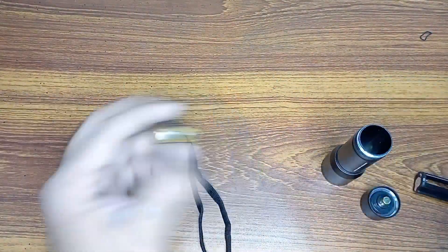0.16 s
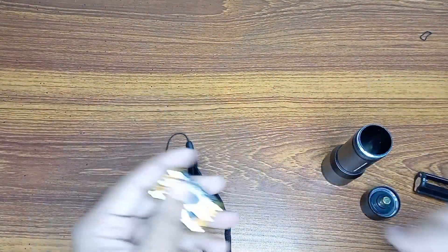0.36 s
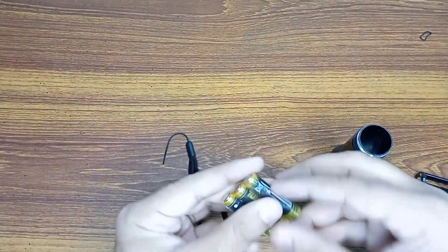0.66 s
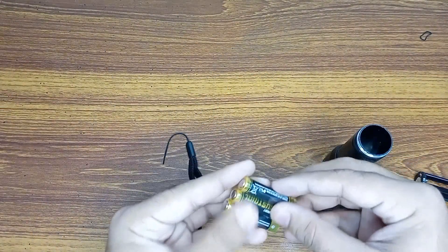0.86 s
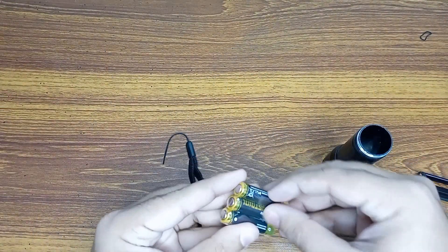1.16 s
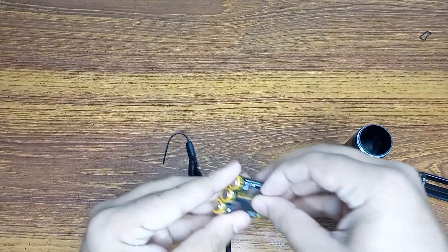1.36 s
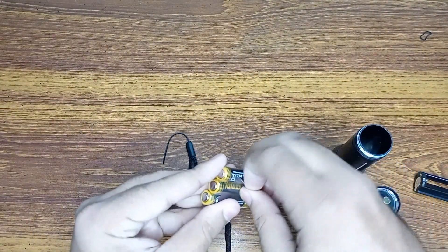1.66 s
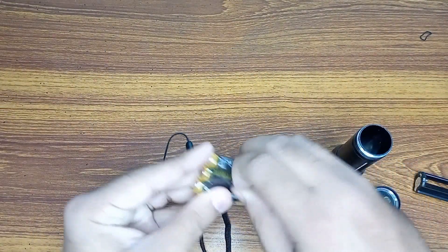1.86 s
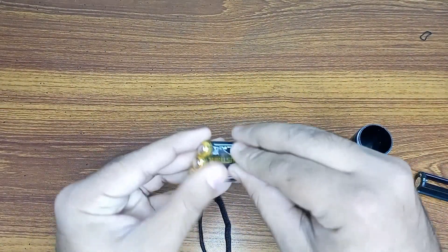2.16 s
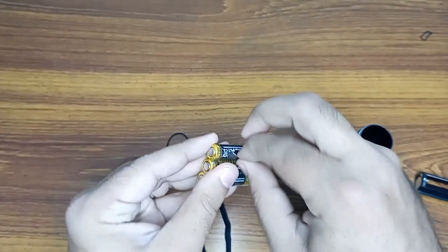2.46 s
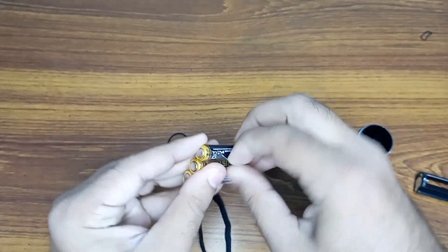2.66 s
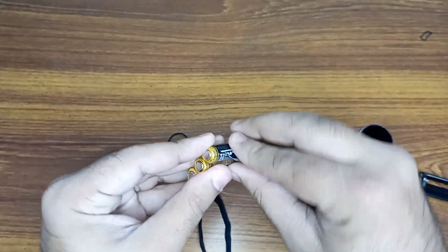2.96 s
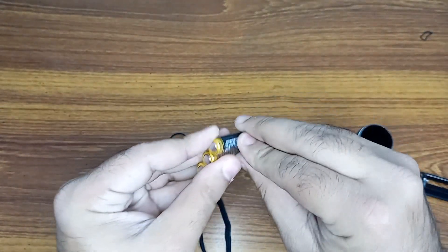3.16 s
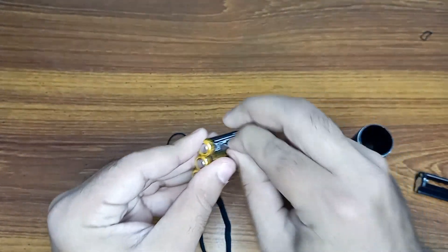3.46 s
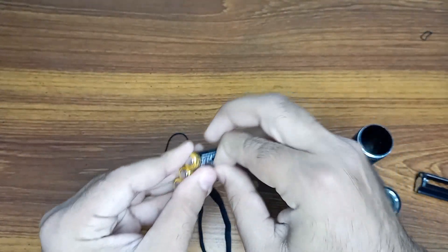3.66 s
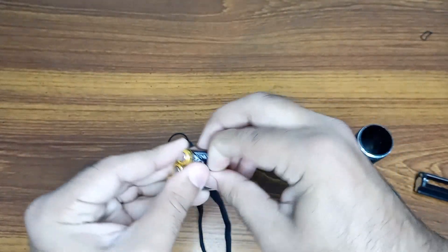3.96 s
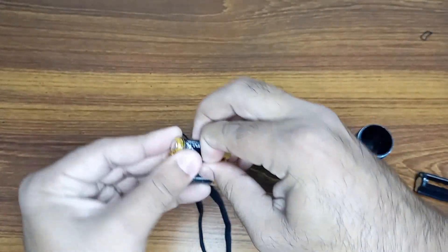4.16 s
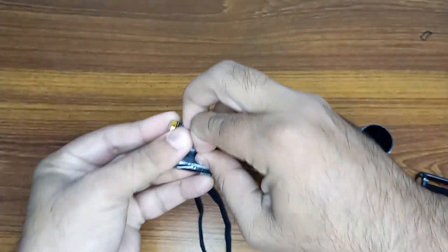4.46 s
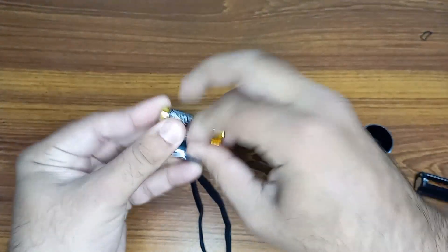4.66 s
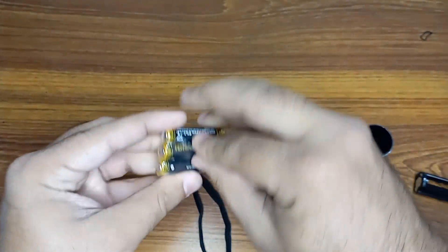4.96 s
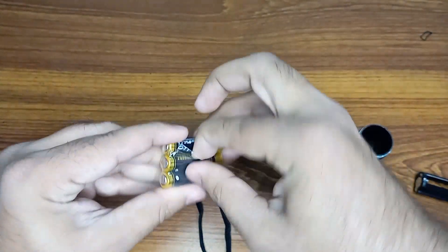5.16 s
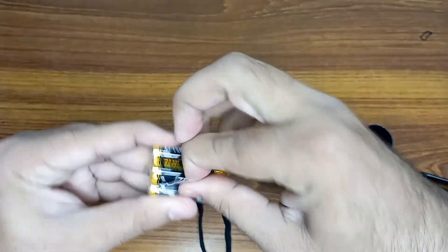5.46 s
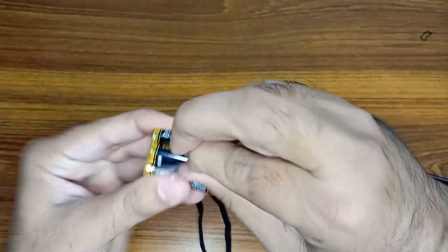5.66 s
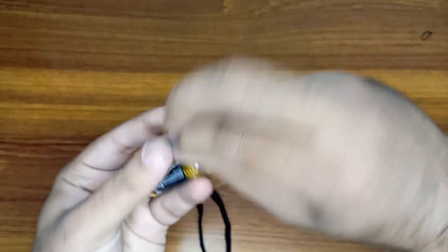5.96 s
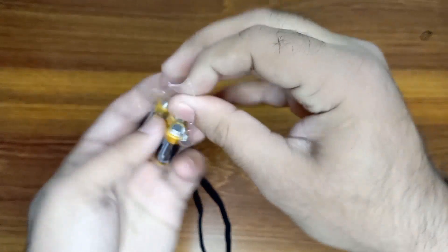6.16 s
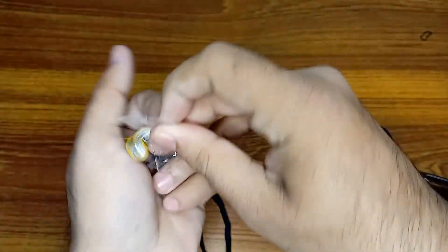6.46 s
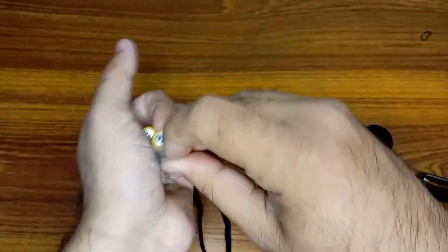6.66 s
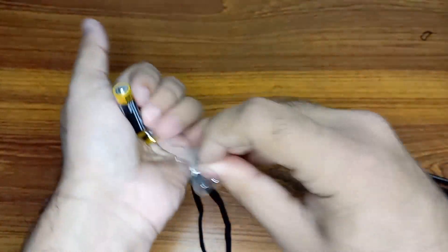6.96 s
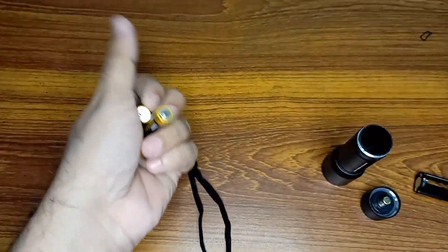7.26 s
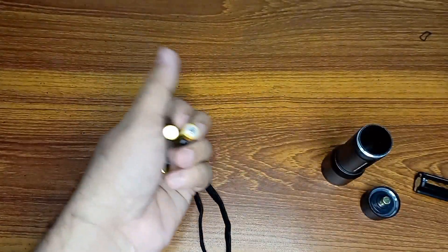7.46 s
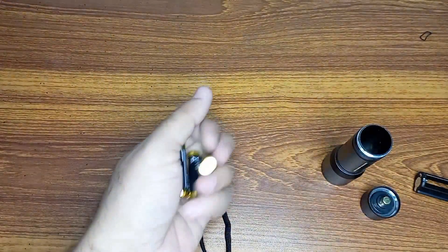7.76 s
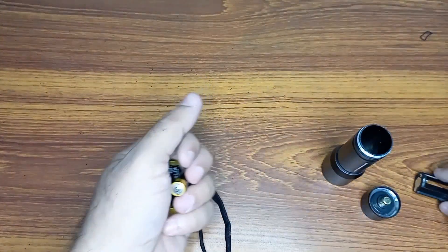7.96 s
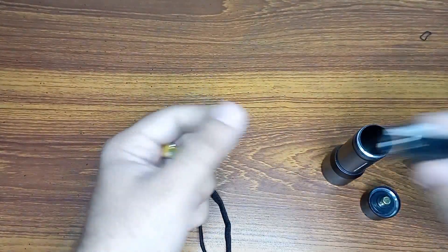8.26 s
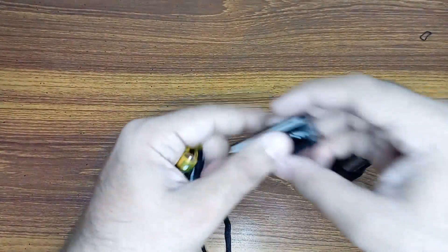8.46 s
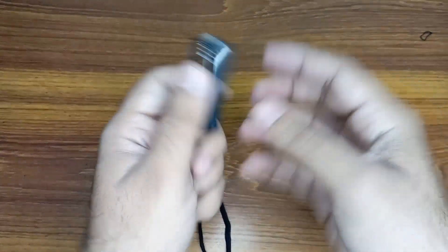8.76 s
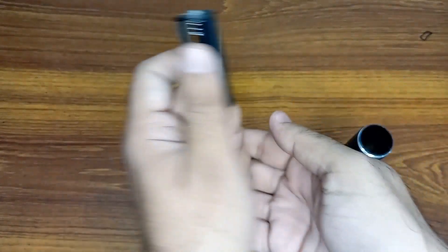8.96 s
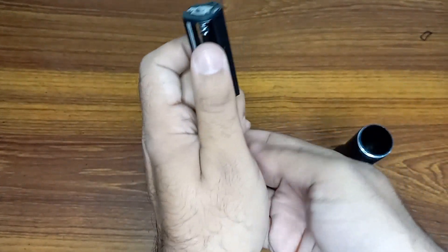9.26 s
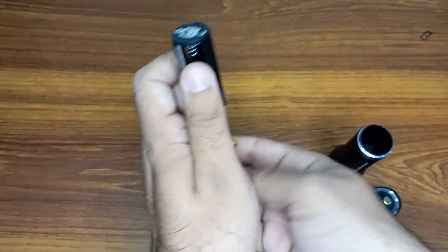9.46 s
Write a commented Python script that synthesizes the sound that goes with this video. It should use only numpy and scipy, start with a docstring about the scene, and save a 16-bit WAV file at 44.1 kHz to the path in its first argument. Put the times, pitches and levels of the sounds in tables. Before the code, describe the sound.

Over low room hum and thin hiss, tiny clicks lead to a loud, crisp snap of stiff plastic. After a pause, a blow bumps the left side of the microphone, and a faint motor far outside swells and rises in pitch. Wrapping then snaps and rustles rapidly around loose batteries, stops, and leaves a distant light clatter and muted handling in a small live room.

```python
"""Sparse snaps of stiff shrink wrap on a battery pack come first, over room hum and hiss with a faint distant motor.
A blow jolts the left microphone port at 4.1 s; then the motor swells and picks up speed, and from 5.3 s the film
snaps and crackles densely as fingers rub it and the cells and holder bump dully. Near 8 s something light lands
far off; soft bumps end the scene. Snaps are damped noise bursts shaped in five bands, rubbing is grainy noise,
bumps are resonated noise, the motor is a sine; near echoes and a noise tail make the room."""
import sys
import numpy as np
from scipy import signal
from scipy.fft import rfft, irfft, next_fast_len
from scipy.io import wavfile

SR = 44100
rng = np.random.default_rng(int(sys.argv[2]) if len(sys.argv) > 2 else 0)


def generate_wav(signal):
    """Clip the signal to [-1, 1] and save it as 16-bit WAV at the path in sys.argv[1]."""
    frames = np.transpose(np.atleast_2d(signal))
    scaled = np.clip(frames, -1, 1) * 32767
    pcm = np.round(scaled).astype(np.int16)
    wavfile.write(sys.argv[1], SR, pcm)


N = 424241

# snaps of film, clicks of cells and holder: start_s, level_db (main band), weight_db (how hard it shakes the pack),
# pitch_hz (part that springs loose), pan_db (left minus right), room_send_db (relative to the snap)
SNAPS = [(0.3626, -62.5, 15, 3900, 0, 0.5), (.4043, -57.5, 3, 5700, 2, -7), (0.5627, -61.5, 8, 10900, 2, 3),
         (1.0309, -57.5, 6, 8400, -1, -9), (1.2285, -54.5, 0, 5300, -1, -9),
         (1.2499, -52.5, 2, 5500, 3, -4.5), (1.2768, -55, 4, 5200, 2, -7.5),
         (1.4951, -43.5, -13, 5400, 0, -5.5), (1.8798, -19, 2.5, 9660, 4.5, -3.5),
         (2.0951, -57.5, -11, 10550, 5, -4), (2.2242, -37.5, 4.5, 10100, 0, -3),
         (2.8813, -56.5, 11, 9900, 2, 2), (4.0999, -25.5, -13, 9900, 2, 3),
         (4.4663, -42, -28, 10600, 6, -3), (4.7293, -46.5, -3, 10300, 3, 0), (4.751, -40, 0, 8400, 3, 5),
         (4.7625, -36, -6.5, 11300, 6, -2), (4.831, -39, 6, 9300, 3, -4), (4.931, -47.5, -3, 9800, 2, -4),
         (5.3824, -35.5, -8.5, 8200, -2, 2), (5.3974, -39.5, -17, 11200, 7.5, -3),
         (5.4239, -25, 7, 6500, 2, -5), (5.5639, -27.5, -16.5, 11400, 3, 1),
         (5.8012, -21, -18.5, 10800, 6, -2), (5.8719, -16.5, 8.5, 10000, 2.5, -8.5),
         (5.8874, -33.5, -4.5, 9600, -2.5, 8), (5.905, -28.5, -14, 9600, 8, 0),
         (5.9529, -36, -15, 9300, 13, 2), (5.97, -34, -5.5, 5300, 5, 0), (5.9989, -38, -15, 9400, 16, 6),
         (6.1288, -37.5, -4.5, 9600, 6.5, 5), (6.1462, -34.5, 0, 10600, 5.5, 5),
         (6.17, -29, 1.5, 4800, 10.5, -6.5), (6.2796, -40.5, -7, 10500, 2, 9),
         (6.3028, -25.5, 2, 10700, 4.5, -4), (6.3191, -33.5, -12, 10600, 20, 0),
         (6.3469, -22, 2, 10300, 2, -2.5), (6.5082, -19.5, -5.5, 9600, 2, -2.5),
         (6.608, -44.5, 21, 9000, 1, 6), (6.7436, -42.5, 14.5, 9700, 0, 5),
         (6.8324, -24.5, -8, 8800, 1, -2), (6.931, -50, 14, 10200, 1, -24),
         (6.9736, -25.5, 4, 9500, 3.5, -2.5), (7.0064, -26.5, 12, 10300, 1, -3),
         (7.2132, -57, 26.5, 10200, 6, -4), (7.4724, -61, 23, 3400, -2, 0), (7.512, -34, 0, 3807, -1, -6),
         (7.534, -33.5, 0, 9600, -9, 1.5)]


def snaps():
    """All snaps: the sound straight from the hands, and what they send into the room."""
    direct, sent = np.zeros((2, N)), np.zeros((1, N))
    for start_s, level_db, weight_db, pitch_hz, pan_db, room_send_db in SNAPS:
        levels_db = level_db + snap_levels(weight_db, pitch_hz)
        add(direct, start_s - .0003, snap(levels_db, pitch_hz, pan_db))
        # summed over all directions a snap has a smooth spectrum, like one clean click
        click = signal.unit_impulse(1024)[None]
        add(sent, start_s, bands_of(click, levels_db + room_send_db, pitch_hz))
    return direct, sent[0]


def snap(levels_db, pitch_hz, pan_db, t60_s=.018, crack=0.86, crack_s=0.00033, recoil=0.33,
         alike=0.33, turn_hz=3300, turn_width_hz=2400):
    """One snap: a crack, a recoil a moment later, and the dense, quickly damped modes of film and cells."""
    t = np.arange(2048) / SR
    since_recoil = t - rng.uniform(0.0015, .003)
    first = crack * np.exp(-t / crack_s)
    second = recoil * (since_recoil > 0) * np.exp(-np.abs(since_recoil) / crack_s)
    envelope = from_db(-60 * t / t60_s) + first + second
    shared, *own = rng.standard_normal((3, len(t)))
    # the way round the housing to the right port turns the phase in the mid treble
    turned = shared - 2 * resonance(shared, turn_hz, turn_width_hz)
    noise = np.sqrt(alike) * np.array([shared, turned]) + np.sqrt(1 - alike) * np.array(own)
    port_gain = rms_one(from_db(np.array([[pan_db], [-pan_db]]) / 2))
    return bands_of(noise * envelope, levels_db, pitch_hz) * port_gain


# edges of the knock, body, clack, main and top bands: edge_hz
SNAP_EDGES_HZ = [200, 900, 3200, 7500, 11500, 14500]
# plain crack in each band: level_db
CRACK_DB = [-24.5, -15, -1.5, 0, -4]
# share of the weight taken by each band: ratio
WEIGHT_SHARE = [0.92, .55, .2, 0, 0]
# the loose part radiates best around its own pitch
LOOSE_LIFT_DB, LOOSE_SPREAD_OCTAVES = 6.5, 0.49


def snap_levels(weight_db, pitch_hz):
    """Band levels relative to the main band: weight adds lows, and the loose part lifts bands near its pitch."""
    edges = np.array(SNAP_EDGES_HZ)
    octaves = np.log2(np.sqrt(edges[1:] * edges[:-1]) / pitch_hz)
    lift_db = LOOSE_LIFT_DB * np.exp(-(octaves / LOOSE_SPREAD_OCTAVES) ** 2)
    colour_db = np.array(CRACK_DB) + weight_db * np.array(WEIGHT_SHARE) + lift_db
    return colour_db - colour_db[3]


# resonances of the pack held in the fingers: centre_hz, width_hz, lift_db
PACK = [(320, 360, 10), (1750, 700, 1)]


def bands_of(burst, levels_db, pitch_hz, ring_db=6.5, ring_width_hz=900):
    """Shapes a burst with the loose part's ring, pack resonances and band levels (energy spread over 6 ms)."""
    size, edges = burst.shape[-1], np.array(SNAP_EDGES_HZ)
    spectrum, hz = rfft(burst), np.arange(size // 2 + 1) * SR / size
    power = 2 * np.mean(np.abs(spectrum) ** 2, axis=0) / (size * .006 * SR)
    gain_db = -10 * np.log10(1 + (edges[0] / (hz + 1)) ** 6)   # small things radiate no bass
    for centre_hz, width_hz, lift_db in [(pitch_hz, ring_width_hz, ring_db), *PACK]:
        gain_db = gain_db + lift_db / (1 + (2 * (hz - centre_hz) / width_hz) ** 2)
    which = np.digitize(hz, edges)
    centres_hz = (edges[1:] + edges[:-1]) / 2
    for _ in range(4):   # neighbouring bands overlap, so their levels settle in a few rounds
        held_db = 10 * np.log10(np.bincount(which, power * from_db(gain_db) ** 2)[1:-1])
        gain_db = gain_db + np.interp(hz, centres_hz, levels_db - held_db)
    # minimum phase: nothing sounds before the crack
    cepstrum = irfft(np.log(from_db(gain_db)))
    cepstrum[1:size // 2] *= 2
    cepstrum[size // 2 + 1:] = 0
    return irfft(spectrum * np.exp(rfft(cepstrum)))


# only snaps above the threshold settle; each later crackle is weaker by the loss
SETTLES_ABOVE_DB, SETTLE_DB, SETTLE_GAP_S, SETTLE_LOSS_DB = -33.5, -19.5, .009, 2


def settling(count=3):
    """After each hard snap the film settles in weaker crackles of the same part, at uneven gaps."""
    out = np.zeros((2, N))
    for start_s, level_db, weight_db, pitch_hz, pan_db, _ in SNAPS:
        if level_db <= SETTLES_ABOVE_DB:
            continue
        gaps_s = SETTLE_GAP_S * rng.uniform(0.55, 2, count)
        for k, later_s in enumerate(np.cumsum(gaps_s)):
            crackle_db = level_db + SETTLE_DB - SETTLE_LOSS_DB * k
            levels_db = crackle_db + snap_levels(weight_db, pitch_hz)
            add(out, start_s + later_s, snap(levels_db, pitch_hz, pan_db))
    return out


def port_jolt(start_s=4.0996, level_db=-2.5, swing_hz=78, t60_s=0.029, push_s=0.00075, push=0.7,
              right_db=-18, rasp_db=-15, rasp_s=0.0018):
    """A blow on the left port: one inward push with a rasp, then the pressure swings back and dies."""
    t, out = np.arange(4096) / SR, np.zeros((2, N))
    dent = -push * (t / push_s) ** 2 * np.exp(1 - (t / push_s) ** 2)
    after_s = np.maximum(t - push_s, 0)
    swing = np.sin(2 * np.pi * swing_hz * after_s) * from_db(-60 * after_s / t60_s)
    rasp_noise = rms_one(band(rng.standard_normal(len(t)), 1250, 3800))
    rasp = from_db(rasp_db) * rasp_noise * np.exp(-t / rasp_s)
    add(out, start_s, (dent + swing + rasp) * from_db([[level_db], [level_db + right_db]]))
    return out


# colour of the rubbing: freq_hz, gain_db
RUB_COLOUR = [(1000, -11.5), (3000, -3), (6000, -5), (10500, 5), (13500, -0.5), (15000, -33)]


def rubbing(grains_per_s=90, spread_db=4.0, trim_db=-1.5, smooth_db=-6, grain_s=0.0014):
    """Skin sticks and slips on the film: tiny ticks of uneven size in a soft hiss."""
    sizes = from_db(spread_db * np.minimum(rng.exponential(1, N), 4))
    ticks = (rng.random(N) < grains_per_s / SR) * sizes
    envelope = signal.lfilter([1], [1, -np.exp(-1 / (grain_s * SR))], ticks + 1e-18)
    grains = diffuse_noise() * (rms_one(envelope) + from_db(smooth_db))
    return from_db(trim_db) * sliding() * rms_one(coloured(grains, RUB_COLOUR))


# fingers slide over the film: start_s, length_s, level_db (before the rubbing trim)
STROKES = [(.35, 0.075, -68.5), (0.873, 0.11, -70.5), (2.25, .15, -76.5), (2.82, .12, -72.5),
           (3.92, .15, -74), (4.55, 0.7, -80.5), (5.27, .03, -67.5), (5.973, .06, -52),
           (6.116, 0.45, -55.5), (6.799, 0.22, -58.5), (8.377, 0.52, -73)]
STROKE_RISE_S, STROKE_FADE_S = 0.071, 0.14
GRIP_DB = -81.5   # fingers that only hold the pack, before the rubbing trim


def sliding():
    """Strength of the rubbing: each stroke swells, holds and fades over the steady grip."""
    t = np.arange(N) / SR
    strength = np.full(N, from_db(GRIP_DB))
    for start_s, length_s, level_db in STROKES:
        rise = np.maximum(start_s - t, 0) / STROKE_RISE_S
        fade = np.maximum(t - start_s - length_s, 0) / STROKE_FADE_S
        strength = np.maximum(strength, from_db(level_db) * np.exp(-rise - fade))
    return strength


# soft bumps of cells and holder, muffled by the hand: start_s, level_db, centre_hz, width_hz (each of 2 passes), t60_s
BUMPS = [(5.59, -51, 330, 250, 0.041), (6.322, -51, 424, 258, 0.26), (6.35, -52.5, 420, 220, .21),
         (6.626, -54, 2203, 1205, 0.11), (7.011, -45, 382, 550, 0.05), (8.727, -52.5, 2140, 1307, 0.019),
         (9.046, -50.5, 336.4, 367, 0.031)]


def bumps():
    """Dull contacts, each a short shudder in one broad resonance."""
    t, out = np.arange(8192) / SR, np.zeros((2, N))
    for start_s, level_db, centre_hz, width_hz, t60_s in BUMPS:
        once = resonance(rng.standard_normal(len(t)), centre_hz, width_hz)
        shudder = rms_one(resonance(once, centre_hz, width_hz))
        add(out, start_s, (from_db(level_db) * shudder * from_db(-60 * t / t60_s))[None])
    return out


# something light lands far off: start_s, level_db
LANDING = [(7.982, -47.5), (8.003, -49), (8.076, -57.5)]
# colour of its scuffs: freq_hz, gain_db
LANDING_COLOUR = [(300, -31.5), (800, 3), (1300, -4.5), (2500, -5.5), (5000, -0.5), (8000, 2.5), (12000, 2),
                  (15000, -26)]


def landing(bounce_s=0.011):
    """A light thing skitters to rest far off: short, decaying scuffs of coloured noise."""
    t, out = np.arange(4096) / SR, np.zeros((2, N))
    for start_s, level_db in LANDING:
        scuff = rms_one(coloured(rng.standard_normal((2, len(t))), LANDING_COLOUR))
        add(out, start_s, from_db(level_db) * scuff * np.exp(-t / bounce_s))
    return out


# near reflections: left_delay_s, right_delay_s, level_db
ECHOES = [(.0031, 0.0047, -11), (.0072, 0.0066, -18.5), (0.012, .0151, -22)]


def reflections(x):
    """The table and things near it throw each snap back, with a separate delay to each port."""
    n, out = np.arange(N), np.zeros((2, N))
    for left_delay_s, right_delay_s, level_db in ECHOES:
        left = np.interp(n - left_delay_s * SR, n, x[0])
        right = np.interp(n - right_delay_s * SR, n, x[1])
        out += from_db(level_db) * np.array([left, right])
    return out


# decay time of the room: freq_hz, t60_s
ROOM_T60 = [(200, 0.74), (1500, 0.73), (4000, 0.44), (8000, 0.37), (14000, 0.35)]
# colour of its tail: freq_hz, gain_db
ROOM_COLOUR = [(150, -10), (500, -9.5), (1800, -4.5), (4000, -4.5), (9000, -7.5), (13500, -10.5),
               (15000, -25)]


def room(x, build_s=0.0066):
    """A diffuse tail, different at each port, that dies sooner in the treble."""
    t, tail = np.arange(round(.6 * SR)) / SR, 0
    edges_hz = np.geomspace(120, 16000, 15)
    for low_hz, high_hz in zip(edges_hz, edges_hz[1:]):
        decay = from_db(-60 * t / at_hz(ROOM_T60, np.sqrt(low_hz * high_hz)))
        envelope = decay * (1 - np.exp(-(t / build_s) ** 2))
        noise = band(rng.standard_normal((2, len(t))), low_hz, high_hz)
        tail = tail + noise * envelope / np.sqrt(np.sum(envelope ** 2))
    return signal.fftconvolve(x[None], coloured(tail, ROOM_COLOUR), axes=1)[:, :N]


# a motor far outside picks up speed: time_s, firing_hz, level_db (about which it wavers)
MOTOR = [(4.3, 87.7, -82.5), (4.6, 90.2, -68), (5.05, 90.5, -69.5), (5.3, 106, -71), (6.2, 106.7, -69.5),
         (6.45, 130.9, -68.5), (7.6, 166.7, -66), (8.3, 155.2, -69.5), (9.4, 154.7, -64)]


def motor(waver_db=3.5, waver_hz=9):
    """Only the firing tone comes through the walls, a sine whose level wavers on the way."""
    firing_hz, level_db = in_time(MOTOR)
    waver = np.interp(np.arange(N) / SR * waver_hz, np.arange(256), rng.standard_normal(256))
    tone = np.sqrt(2) * np.sin(2 * np.pi * np.cumsum(firing_hz) / SR)
    return from_db(level_db + waver_db * waver) * tone


# room hum: time_s, level_db
HUM = [(1.5, -66), (3.2, -67.5), (5, -64.5), (7, -62.5), (9.6, -65)]
# colour of the hum: freq_hz, gain_db
HUM_COLOUR = [(20, -16), (35, -11), (55, -8), (100, -2.5), (150, 1), (200, -8.5), (400, -11.5),
              (700, -22.5), (1500, -35), (3000, -57)]
# colour of the hiss: freq_hz, gain_db
HISS_COLOUR = [(600, -13), (1400, -5), (2500, -6.5), (5000, -10.5), (9800, -10), (13800, -15),
               (15000, -28.5)]
HISS_DB = -78


def background():
    """Low room hum of slowly moving level and faint, steady microphone hiss."""
    hum_db, = in_time(HUM)
    hum = from_db(hum_db) * rms_one(coloured(diffuse_noise(), HUM_COLOUR))
    hiss = from_db(HISS_DB) * rms_one(coloured(diffuse_noise(), HISS_COLOUR))
    return hum + hiss


# likeness of the two ports for sound from all around: freq_hz, correlation
LIKENESS = [(60, 0.84), (150, 1), (400, 0.64), (1300, 0.11), (4400, 0.055), (8000, 0.46), (15000, 1)]


def diffuse_noise():
    """White stereo noise as the two ports pick it up from all around."""
    size = next_fast_len(N)
    mid, side = rfft(rng.standard_normal((2, size)))
    alike = np.clip(at_hz(LIKENESS, np.arange(len(mid)) * SR / size), -.99, .99)
    stereo = np.sqrt(1 + alike) * mid + np.sqrt(1 - alike) * side * [[1], [-1]]
    return irfft(stereo, size)[:, :N]


def from_db(db):
    """Decibels to amplitude."""
    return 10 ** (np.asarray(db) / 20)


def rms_one(x):
    """Scales to an RMS of 1."""
    return x / np.sqrt(np.mean(x ** 2) + 1e-20)


def in_time(rows):
    """Each column of a curve, sample by sample."""
    time_s, *columns = np.transpose(rows)
    return [np.interp(np.arange(N) / SR, time_s, column) for column in columns]


def at_hz(points, hz):
    """Reads a spectrum on a log-frequency axis."""
    points = np.array(points)
    return np.interp(np.log(np.maximum(hz, 1)), np.log(points[:, 0]), points[:, 1])


def band(x, low_hz, high_hz, order=3):
    """Butterworth band-pass."""
    edges_hz = [low_hz, min(high_hz, .48 * SR)]
    return signal.sosfilt(signal.butter(order, edges_hz, "band", fs=SR, output="sos"), x)


def resonance(x, hz, width_hz):
    """Two-pole resonance with gain 1 on top."""
    r = np.exp(-np.pi * width_hz / SR)
    zeros = np.array([1, 0, -1]) * (1 - r * r) / 2
    poles = [1, -2 * r * np.cos(2 * np.pi * hz / SR), r * r]
    return signal.lfilter(zeros, poles, x + 1e-18)


def coloured(x, spectrum):
    """Filters a signal by a spectrum of freq_hz, gain_db."""
    size = next_fast_len(x.shape[-1])
    gain = from_db(at_hz(spectrum, np.arange(size // 2 + 1) * SR / size))
    return irfft(rfft(x, size) * gain, size)[..., :x.shape[-1]]


def add(track, start_s, sound):
    """Mixes a short sound into a track."""
    i = max(round(start_s * SR), 0)
    track[:, i:i + sound.shape[-1]] += sound[:, :max(N - i, 0)]


def scene():
    """Sums the sources, near reflections and room tail."""
    direct, sent = snaps()
    far, dull = landing(), bumps()
    tail = room(sent + dull[0] + from_db(11.5) * far[0])   # the far landing excites the room more
    hands = direct + settling() + port_jolt() + rubbing() + dull
    return hands + far + reflections(direct) + tail + motor() + background()


CUTOFF_HZ = 16600


def record(dry):
    """The microphone sheds the deepest bass, overloads on the hardest peaks and rolls off above 14 kHz; the top is cut."""
    lean = signal.sosfilt(signal.butter(3, 42, "high", fs=SR, output="sos"), dry)
    clipped = np.clip(lean, -.8, .8)
    soft = signal.sosfilt(signal.butter(14, 14100, fs=SR, output="sos"), clipped)
    return signal.sosfilt(signal.cheby2(12, 70, CUTOFF_HZ, fs=SR, output="sos"), soft)


dry = scene()
out = record(dry)
generate_wav(out)
```